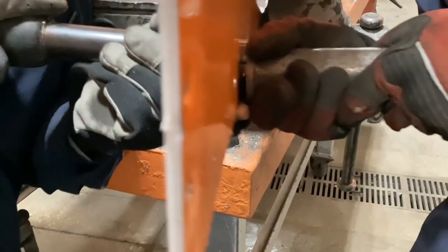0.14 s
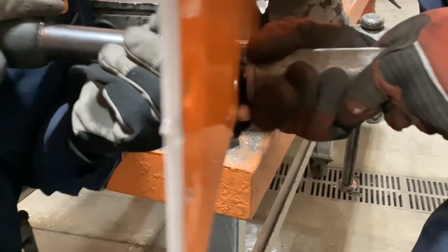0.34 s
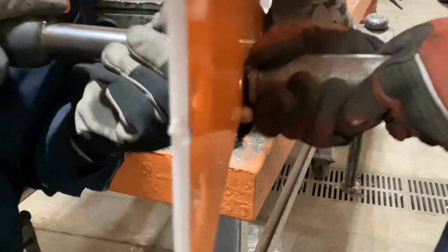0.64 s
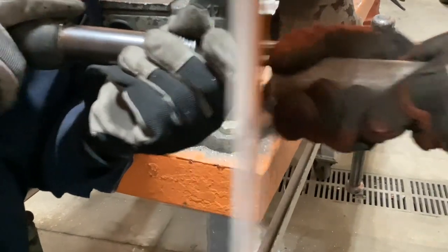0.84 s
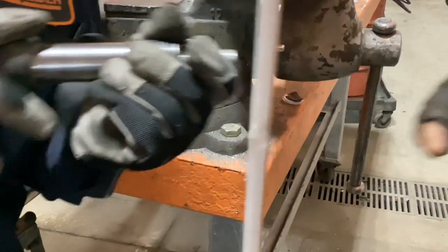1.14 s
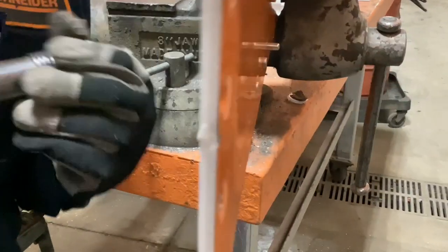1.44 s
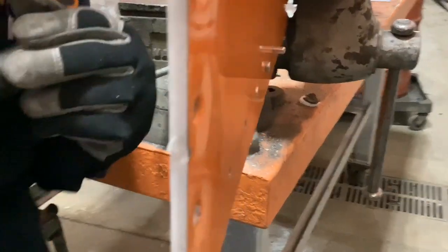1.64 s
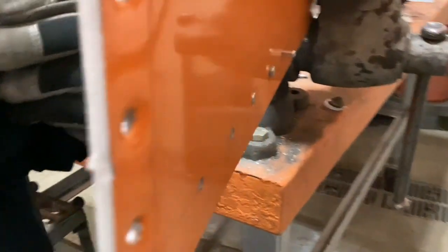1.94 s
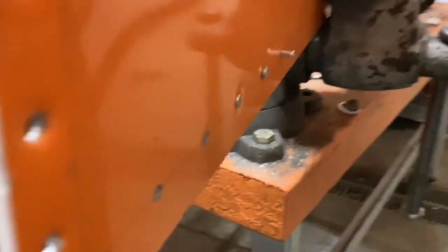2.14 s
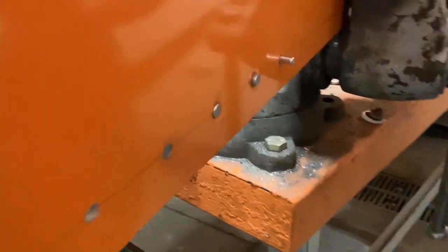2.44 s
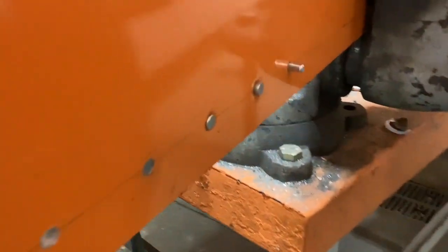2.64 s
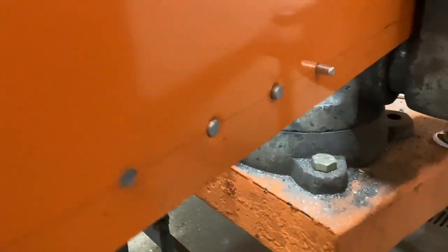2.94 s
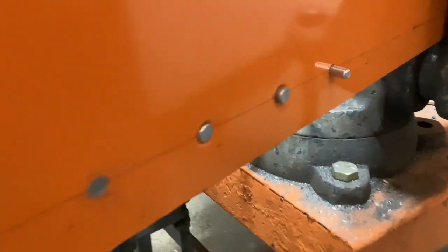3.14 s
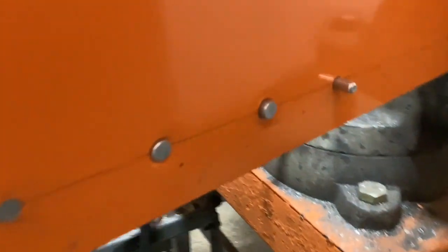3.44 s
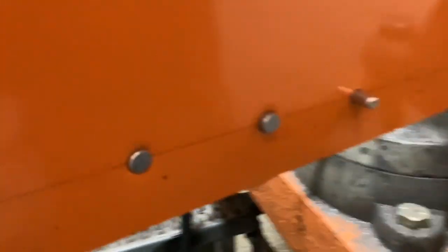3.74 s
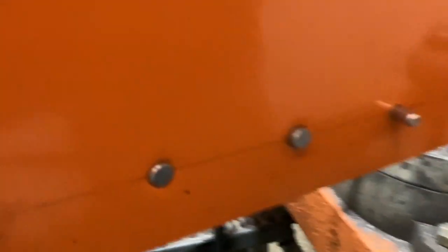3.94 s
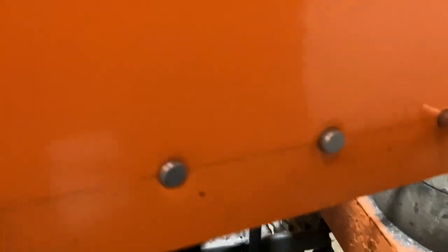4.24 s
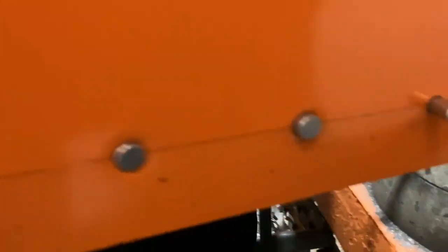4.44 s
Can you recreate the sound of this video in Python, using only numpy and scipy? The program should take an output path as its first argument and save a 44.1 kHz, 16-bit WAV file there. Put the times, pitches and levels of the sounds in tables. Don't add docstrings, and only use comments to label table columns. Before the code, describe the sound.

Close and very loud, a rapid machine-gun burst of metal blows opens in a reverberant workshop, growing more hollow and booming at its end. A weak final tap follows, then the steel hums and the echo dies away. Very quiet fan noise remains with a cluster of tiny ticks, two sharper clicks, brushing fabric and a barely audible squeak. Phone microphone with compressed loud peaks.

```python
import sys
import numpy as np
from scipy import signal
from scipy.fft import rfft, irfft, next_fast_len
from scipy.io import wavfile
from scipy.ndimage import uniform_filter1d

SR = 44100
rng = np.random.default_rng(int(sys.argv[2]) if len(sys.argv) > 2 else 0)


def volts_from_decibels(level):
    exponent = np.asarray(level, float) / 20
    return 10 ** exponent


def unload_audio(sound):
    columns = np.transpose(np.atleast_2d(sound))
    steps = np.round(np.clip(columns, -1, 1) * 32767)
    wavfile.write(sys.argv[1], SR, steps.astype(np.int16))


N = 203113

# (time [s], crack peak [dB], panel ring [dB])
BLOW_EVENTS = [(0.0118, -5, -9), (0.0441, -11.5, -19), (0.0771, -10, -16), (0.109, -9, -11.5),
               (0.1414, -9, -15.5), (0.1731, -9.5, -12), (0.2063, -9.5, -10), (0.2395, -10.5, -10.5),
               (0.2721, -10.5, -12.5), (0.3031, -10, -11), (0.335, -9, -13.5), (0.3682, -8.5, -13),
               (0.4008, -9, -14), (0.4315, -8.5, -16.5), (0.4647, -9, -15.5), (0.498, -8.5, -17.5),
               (0.5287, -8.5, -19), (0.561, -8.5, -20.5), (0.594, -7.5, -13.5), (0.627, -8, -14),
               (0.6594, -9.5, -11), (0.691, -10, -11), (0.7229, -6.5, -9.5), (0.7558, -8.5, -12),
               (0.7875, -11, -3), (0.821, -11.5, -5), (0.8518, -12.5, -10.5), (0.8834, -10, -8),
               (0.9222, -12.5, -14), (0.997, -25.5, -20.5)]
# (frequency [Hz], width [Hz], level [dB])
TOOL_MODES = [(5300, 98, -15.5), (5800, 30, -17), (5600, 190, -14.5), (6335, 32, -9.5), (7160, 150, -11.5),
              (8400, 250, -18), (9660, 200, -7), (11200, 200, -15), (13100, 200, -23.5)]
# (frequency [Hz], width [Hz], level [dB])
PANEL_MODES = [(440, 30, -12), (529, 25, -9), (560, 25, -10), (591, 28, -8), (622, 25, -9), (685, 25, -11),
               (863, 24, -6), (905, 22, -8), (1000, 25, -9), (1155, 22, -9), (1330, 30, -5), (1490, 40, -8),
               (1650, 30, -1), (1705, 40, -9), (1822, 28, 0), (1900, 40, -5), (2105, 40, -7),
               (2205, 35, -12), (2480, 40, -14), (2870, 45, -17), (3080, 35, -19.5)]
# (frequency [Hz], level [dB])
CRACK_SPECTRUM = [(1470, -25), (2500, -0.5), (3520, -6), (5150, -2), (5610, -1), (7770, -5), (9360, -1),
                  (15000, -15.5), (16000, -25)]
# (frequency [Hz], level [dB])
CLATTER_SPECTRUM = [(120, -41.5), (200, -18), (346, -11), (575, -12), (736, -8.5), (849, -10), (1220, -8.5),
                    (1860, -7), (2010, -6), (4500, -24), (5850, -56), (9900, -120)]
FREED_HZ = [64.6, 107.7, 172.3, 193.8, 220, 251.5, 253.5, 274.5, 301.5, 317.6, 436, 565, 625, 689, 780.6,
            872, 904.4, 1001, 1034]
# (level [dB], t60 [s])
FREED_DECAY = [(-48, 4.5), (-44, 4), (-37, 2), (-41, 4.2), (-47, 2), (-42, 1.5), (-56, 11), (-46, 3),
               (-44, 2.4), (-39, 2.2), (-46, 2.4), (-48, 2), (-49, 2.4), (-48, 2.4), (-49, 2), (-37, 2.3),
               (-42, 2.4), (-45, 2.4), (-45, 2.4)]
# (frequency [Hz], level [dB])
HALL_SPECTRUM = [(60, -17), (200, -8), (550, -4.5), (900, -1.5), (1400, -0.5), (1750, -10.5), (2300, -5.5),
                 (3500, -1), (4600, -5.5), (5400, -3), (6200, -12.5), (7200, -4.5), (10000, 0),
                 (15000, -11)]
# (frequency [Hz], t60 [s])
HALL_DECAY = [(60, 2.5), (420, 2.1), (1100, 2.35), (1600, 2.2), (2300, 1.8), (2850, 1.5), (3500, 1.15),
              (4400, 1), (5600, .82), (7000, .64), (8700, .48), (14000, .34)]
# (time [s], level [dB])
GAIN_CURVE = [
    (0, -17),
    (.75, -8),
    (.93, -2.5),
    (1.03, -5),
    (1.2, -6.5),
    (2, -5),
]
# (start [s], end [s], level [dB], brightness [dB])
CLOTH_STROKES = [(1.428, 1.438, -70, -22), (1.6, 1.8, -83, -15), (1.972, 1.995, -71, -10),
                 (2.31, 2.467, -71.5, -5.5), (2.476, 2.595, -70.5, -7), (2.61, 2.645, -67.5, -8),
                 (2.75, 2.85, -84, -3), (3.01, 3.06, -78.5, 0), (3.065, 3.092, -71.5, -9),
                 (3.16, 3.238, -71, -4), (3.248, 3.342, -65.5, -6.5), (3.355, 3.415, -79, -11),
                 (3.51, 3.517, -65, -10), (3.54, 3.72, -83, -7), (3.6, 3.68, -80, -5),
                 (3.8, 4.06, -89, -16), (4.106, 4.119, -64, -12), (4.14, 4.16, -79, -15),
                 (4.187, 4.25, -80, -12), (4.28, 4.372, -64.5, -16), (4.38, 4.466, -69, -14),
                 (4.485, 4.544, -67, -10), (4.56, 4.59, -76, -12)]
# (frequency [Hz], level [dB])
CLOTH_SPECTRUM = [(900, -25.5), (1500, -3.5), (1800, -1.5), (2300, -10.5), (3800, -8.5), (4500, -12.5),
                  (5600, -8), (6600, -15.5), (9500, -12), (12000, -18), (14000, -22), (16000, -22)]
# (time [s], peak [dB], pitch [Hz], low knock [dB], snap [dB])
TICK_EVENTS = [
    (2.08, -63.5, 4895, -64, -85),
    (2.0925, -72, 3820, -66, -85),
    (2.1174, -60, 5140, -61, -84),
    (2.1395, -59, 4470, -58, -77),
    (2.162, -53, 5010, -65, -71),
    (2.186, -56, 5540, -67, -70),
    (2.2291, -63.5, 5090, -67, -85),
    (2.4609, -36.5, 7760, -43.5, -62),
    (2.8594, -57, 5380, -74, -86),
    (3.7867, -38, 8000, -42.5, -58.5),
]
# (start [s], end [s], first pitch [Hz], last pitch [Hz], level [dB])
SQUEAK_STRANDS = [
    (3.84, 4.0, 3545, 3515, -86),
    (3.9, 4.0, 3690, 3790, -88),
    (4.0, 4.11, 3800, 4080, -88),
    (4.03, 4.075, 4020, 4160, -85),
    (3.89, 3.95, 1400, 1400, -77),
    (3.98, 4.085, 1400, 1400, -73),
    (4.2, 4.26, 1400, 1400, -75),
]
# (frequency [Hz], level [dB])
FAN_SPECTRUM = [(30, -30), (60, -8), (90, -2.5), (131, 1.5), (287, -11.5), (486, -12.5), (540, -10),
                (649, -18), (1010, -17.5), (1350, -13.5), (2100, -25), (2980, -40), (6000, -48),
                (10500, -52), (12500, -62), (14000, -85), (16000, -100)]
# (frequency [Hz], level [dB])
FAN_LINES = [
    (118, -85),
    (153, -73),
    (1400, -80.5),
]

STROKE_S = .0324
EARLIER_BLOWS = 8
LEAD = int((EARLIER_BLOWS + 1) * STROKE_S * SR)
BAR_OFF_S, RELEASE_S = .77, .94
USUAL_CRACK_DB, USUAL_RING_DB = -9, -13
# boom [dB], thump [dB], damping [factor on decay rate]
HELD, FREE = (-23.5, -35.5, .88), (-13, -32, 0.71)
# boom [dB], thump [dB], damping [share]
HARDER = (.15, .1, .02)
BOOM_PER_CRACK = .7
LURCH_HZ = 95
BEAT = .25
BRUSH_ON_DB_PER_S, BRUSH_OFF_DB_PER_S = 700, 700
SQUEAK_ON_DB_PER_S, SQUEAK_OFF_DB_PER_S = 300, 300


def hammer():
    track = np.zeros(N + LEAD)
    first_s = BLOW_EVENTS[0][0]
    earlier = [(first_s - k * STROKE_S, -8.5, -9.5) for k in range(1, EARLIER_BLOWS + 1)]
    for s, crack_db, ring_db in list(BLOW_EVENTS) + earlier:
        boom_db, thump_db, damping = FREE if s > BAR_OFF_S else HELD
        harder = np.array(HARDER) * (ring_db - USUAL_RING_DB)
        boom_db = boom_db + harder[0] + BOOM_PER_CRACK * (crack_db - USUAL_CRACK_DB)
        sound = blow(crack_db, ring_db, boom_db, thump_db + harder[1], damping * np.exp(harder[2]))
        add(track, s + LEAD / SR, sound)
    return signal.sosfilt(signal.butter(2, LURCH_HZ, "high", fs=SR, output="sos"), track)


def blow(crack_db, ring_db, boom_db, thump_db, damping):
    t = np.arange(int(.2 * SR)) / SR
    puff = volts_from_decibels(-15.5) * np.clip((.0125 - t) / 0.003, 0, 1) * fade(t, .12)
    crack_decay = fade(t, 0.016) + puff + volts_from_decibels(-6.0) * fade(t, 0.097)
    crack = colour(rng.standard_normal(len(t)), CRACK_SPECTRUM) * crack_decay
    tool = ring(TOOL_MODES, t, scatter_db=-0.5, detune=.0015).sum(0)
    contact = 1 - np.exp(-t / .0006)
    impact = volts_from_decibels(crack_db) * contact * (volts_from_decibels(-7.5) * crack + volts_from_decibels(-3.0) * tool)

    late = np.maximum(t - .0051, 0)
    rise = 1 - np.exp(-(late / .0019) ** 2) + volts_from_decibels(-12)
    modes = ring(PANEL_MODES, late - .0025, scatter_db=1, detune=.003, turn=1.5, damping=damping)
    high = np.array(PANEL_MODES)[:, :1] > 1400
    panel = np.where(high, volts_from_decibels(ring_db - 6.5), volts_from_decibels(boom_db - 3.5)) * modes
    clatter = colour(rng.standard_normal(len(t)), CLATTER_SPECTRUM)
    clatter = clatter * fade(late, .11 / damping) * volts_from_decibels((ring_db + boom_db) / 2 - 4)
    lurch = thump(t, thump_db + 5.0 + 1.3 * rng.standard_normal())
    return impact + rise * (panel.sum(0) + clatter) + lurch


def thump(t, db):
    hz, wait = rng.uniform([115, .01], [250, .021])
    return volts_from_decibels(db) * np.exp(-((t - wait) / .0065) ** 2) * np.sin(2 * np.pi * hz * (t - wait))


def released_panel():
    t = np.arange(N) / SR - RELEASE_S
    out = 0
    for hz, (db, t60) in zip(FREED_HZ, FREED_DECAY):
        phase, beat = rng.uniform(0, 1, 2)
        first = np.sin(2 * np.pi * (hz * t + phase))
        second = np.sin(2 * np.pi * (hz + 1 + 2 * beat) * t)
        out = out + volts_from_decibels(db) * fade(t, t60) * (first + BEAT * second)
    return out * np.clip(t / .05, 0, 1)


def hall(x):
    size = next_fast_len(int(3.6 * SR))
    t = np.arange(size) / SR
    hz = np.arange(size // 2 + 1) * SR / size + 1
    noise = rfft(rng.standard_normal(size))
    decay_hz, decay_s = np.array(HALL_DECAY).T
    tail = 0
    for mid in 45 * 2 ** np.arange(0, 8.7, 1 / 3):
        t60 = np.interp(np.log(mid), np.log(decay_hz), decay_s)
        band = np.clip(1 - 3 * np.abs(np.log2(hz / mid)), 0, 1)
        tail = tail + irfft(noise * band, size) * fade(t, t60)
    build_up = 1 - np.exp(-t / 0.005)
    return signal.fftconvolve(x, tail * build_up)[:len(x)]


def ticks():
    track = np.zeros(N)
    t = np.arange(int(0.026 * SR)) / SR
    contact = 1 - np.exp(-t / 0.0011)
    knock_modes = [(1900, 180, 0), (1300, 200, -5), (2350, 200, -8)]
    snap_spectrum = [(1500, -28), (3000, -7), (6000, -7), (14000, -15)]
    for s, db, hz, knock_db, snap_db in TICK_EVENTS:
        click_modes = [(hz, 400, -3), (hz * 0.9, 400, -3.5), (hz * 0.4, 500, -9),
                       (hz * 1.42, 500, -7), (hz * 2.4, 600, -11)]
        click = ring(click_modes, t, scatter_db=0.5, detune=0.012).sum(0)
        knock = ring(knock_modes, t, scatter_db=1.5, detune=.02).sum(0)
        snap = colour(rng.standard_normal(len(t)), snap_spectrum) * fade(t, 0.016)
        touch = volts_from_decibels(db + 5.5) * click + volts_from_decibels(knock_db + 6) * knock + volts_from_decibels(snap_db + 10) * snap
        add(track, s, touch * contact)
    return track


def cloth():
    grain = volts_from_decibels(2.7 * rng.standard_normal(N // 90 + 1).repeat(90)[:N])
    hiss = 0.88 * colour(grain * rng.standard_normal(N), CLOTH_SPECTRUM)
    dull = signal.sosfiltfilt(signal.butter(3, 7500, fs=SR, output="sos"), hiss)
    out = 0
    for start, end, db, bright_db in CLOTH_STROKES:
        gain = stroke(start, end, db, BRUSH_ON_DB_PER_S, BRUSH_OFF_DB_PER_S)
        out = out + gain * (dull + volts_from_decibels(bright_db + 5.5) * (hiss - dull))
    return out


def squeak():
    out = 0
    for start, end, first_hz, last_hz, db in SQUEAK_STRANDS:
        roughness = uniform_filter1d(rng.standard_normal(N), size=150)
        hz = curve([(start, first_hz), (end, last_hz)]) * (1 + .2 * roughness)
        flutter = 1 + 7 * uniform_filter1d(rng.standard_normal(N), size=300)
        gain = stroke(start, end, db + 5.0, SQUEAK_ON_DB_PER_S, SQUEAK_OFF_DB_PER_S)
        out = out + gain * flutter * np.sin(2 * np.pi * np.cumsum(hz) / SR)
    return out


def fans():
    out = volts_from_decibels(-63.5) * colour(rng.standard_normal(N), FAN_SPECTRUM)
    for hz, db in FAN_LINES:
        line = [(hz * 0.7, -40), (hz, 0), (hz * 1.3, -40), (6000, -42.5), (10500, -44), (14000, -56)]
        out = out + volts_from_decibels(db) * colour(rng.standard_normal(N), line)
    return out


def ring(modes, t, scatter_db, detune, turn=9, damping=1):
    hz, width, db = np.transpose(modes)[:, :, None]
    luck = rng.standard_normal((3, len(modes), 1))
    wave = np.sin(2 * np.pi * hz * (1 + detune * luck[0]) * t + turn * luck[1])
    return volts_from_decibels(db + scatter_db * luck[2]) * np.exp(-np.pi * width * damping * t) * wave


def colour(x, table):
    size = next_fast_len(len(x))
    hz = np.arange(size // 2 + 1) * SR / size + 1
    points = np.array(table, float)
    weight = volts_from_decibels(np.interp(np.log(hz), np.log(points[:, 0]), points[:, 1]))
    y = irfft(rfft(x, size) * weight, size)[:len(x)]
    return y / np.sqrt(np.mean(y ** 2))


def fade(t, t60):
    return (t >= 0) * np.exp(-np.log(1000) * np.maximum(t, 0) / t60)


def stroke(start, end, db, on_db_per_s, off_db_per_s):
    t = np.arange(N) / SR
    before, after = np.maximum(start - t, 0), np.maximum(t - end, 0)
    return volts_from_decibels(db - on_db_per_s * before - off_db_per_s * after)


def curve(table):
    rows = np.array(table, float)
    return np.interp(np.arange(N) / SR, rows[:, 0], rows[:, 1])


def add(track, s, sound):
    i = int(s * SR)
    track[i:i + len(sound)] += sound[:len(track) - i]


def scene():
    blows = hammer()
    gain = np.concatenate([np.full(LEAD, volts_from_decibels(GAIN_CURVE[0][1])), volts_from_decibels(curve(GAIN_CURVE))])
    echo = volts_from_decibels(-58.5) * hall(colour(blows / gain, HALL_SPECTRUM)) * gain
    burst = (blows + echo)[LEAD:]
    return (burst + released_panel() + ticks() + cloth() + squeak() + fans())[None]


def top_cut(x):
    return signal.sosfilt(signal.butter(12, 16460, fs=SR, output="sos"), x)


def record(dry):
    rounded = np.tanh(0.85 * dry) / 0.75
    x = signal.sosfilt(signal.butter(6, 62, "high", fs=SR, output="sos"), rounded)
    x = signal.sosfilt(signal.ellip(8, .2, 60, 15800, fs=SR, output="sos"), x)
    return top_cut(x)


dry = scene()
out = record(dry)
unload_audio(out)
```